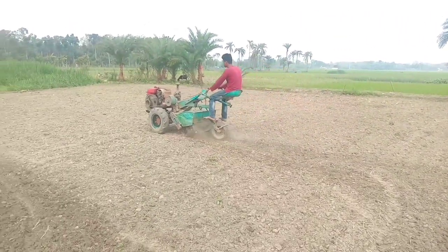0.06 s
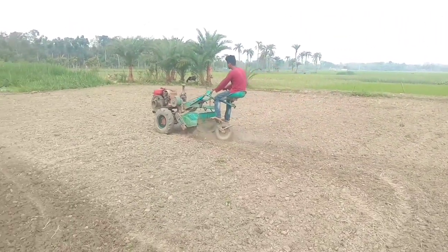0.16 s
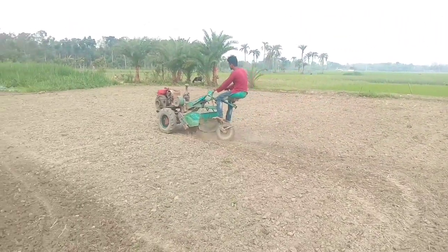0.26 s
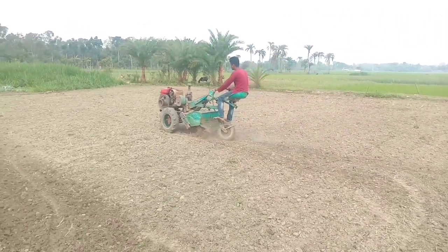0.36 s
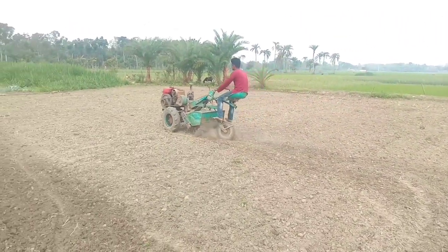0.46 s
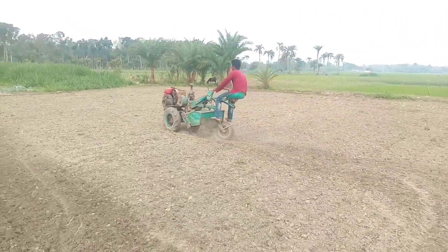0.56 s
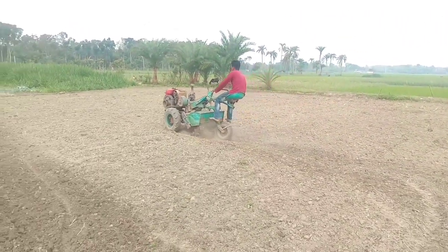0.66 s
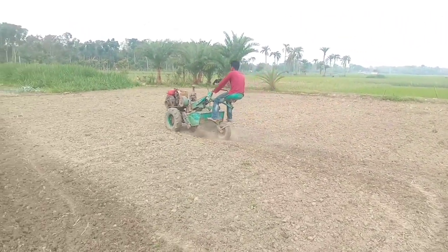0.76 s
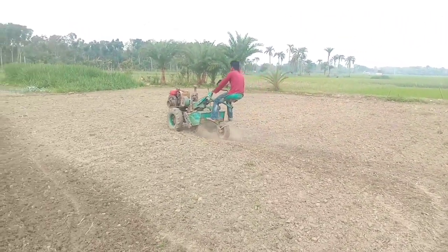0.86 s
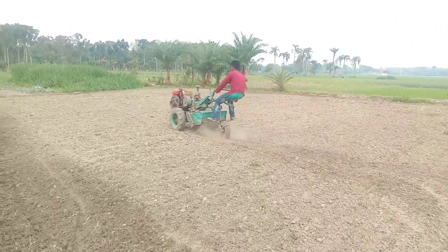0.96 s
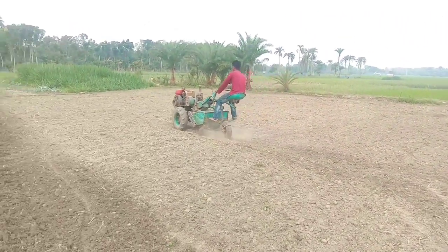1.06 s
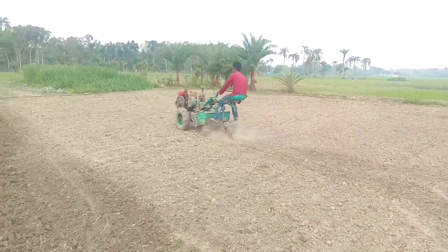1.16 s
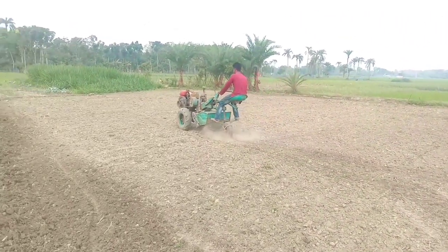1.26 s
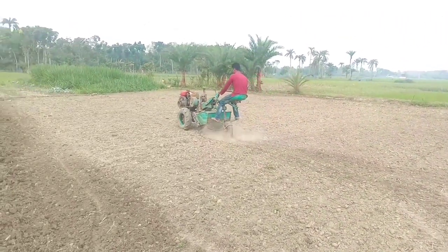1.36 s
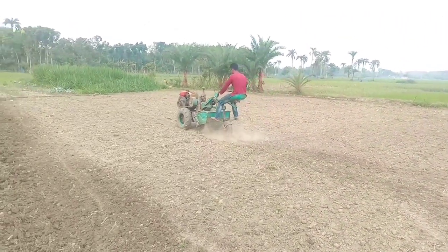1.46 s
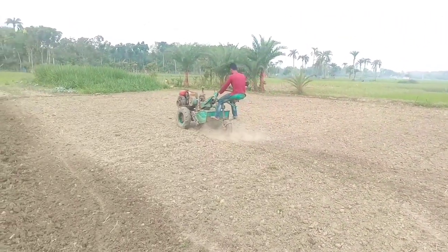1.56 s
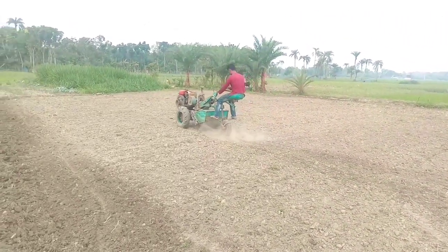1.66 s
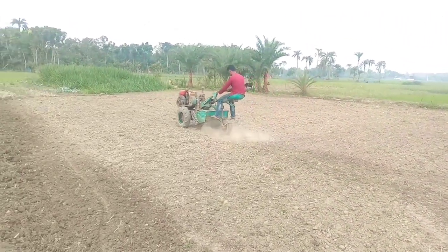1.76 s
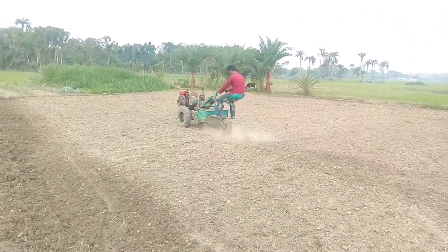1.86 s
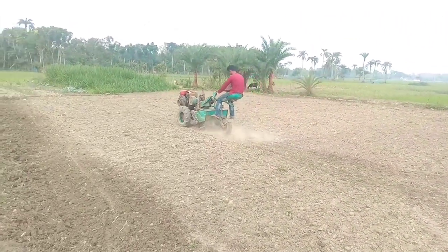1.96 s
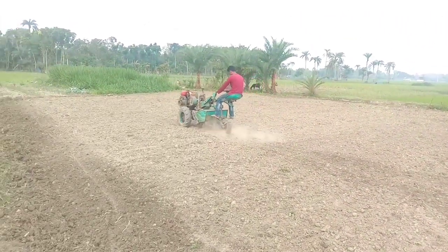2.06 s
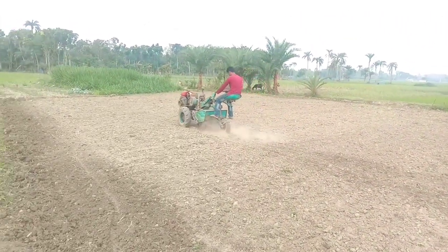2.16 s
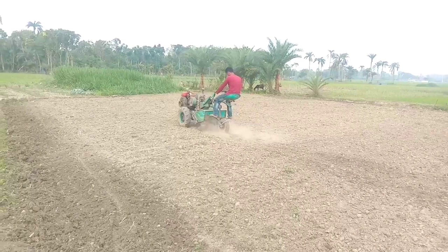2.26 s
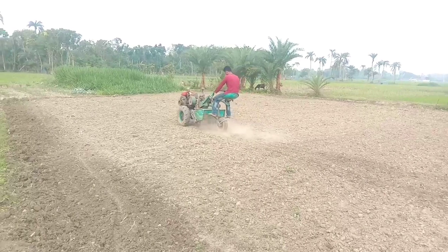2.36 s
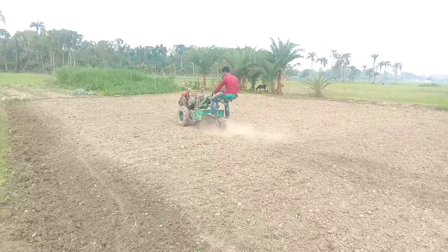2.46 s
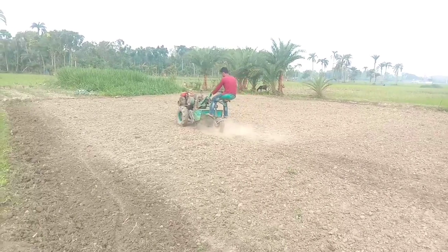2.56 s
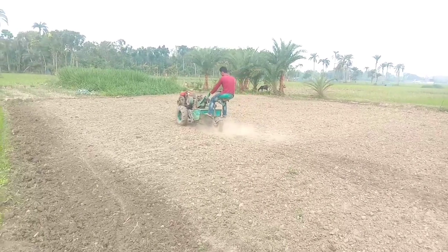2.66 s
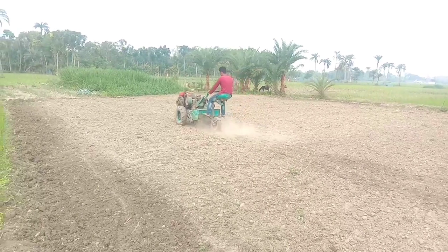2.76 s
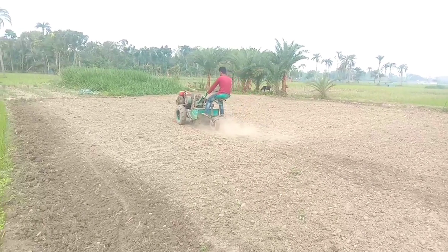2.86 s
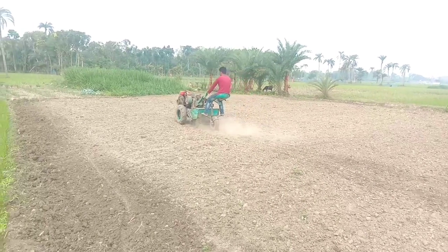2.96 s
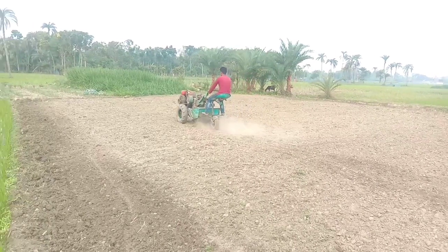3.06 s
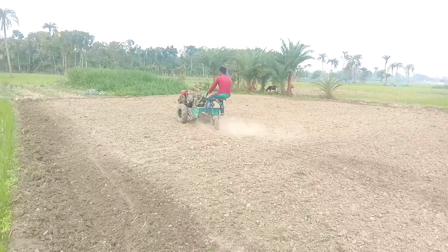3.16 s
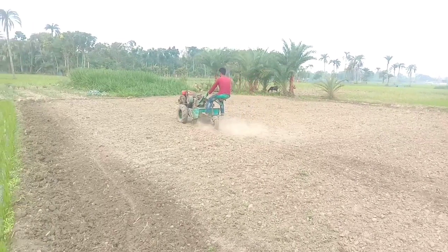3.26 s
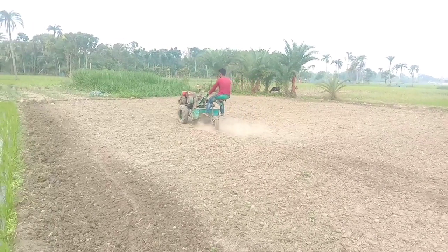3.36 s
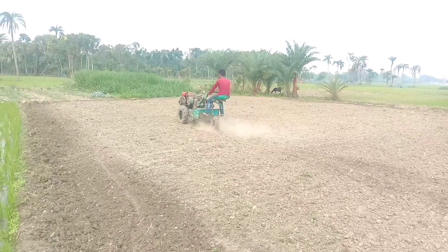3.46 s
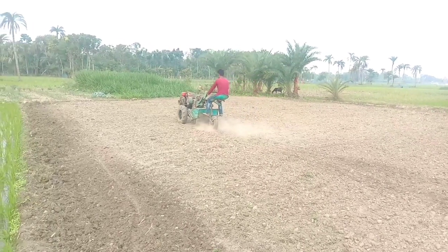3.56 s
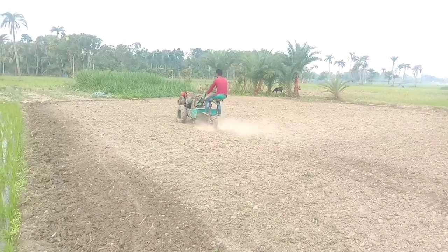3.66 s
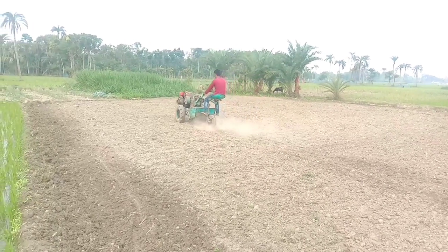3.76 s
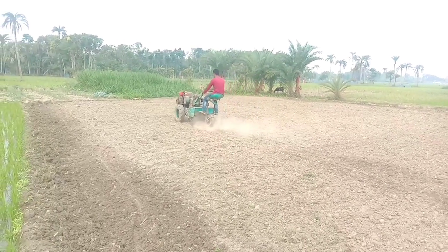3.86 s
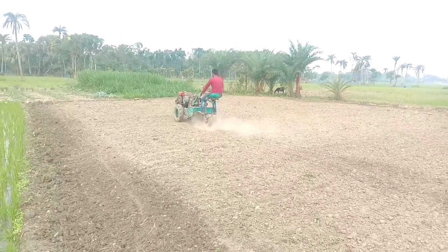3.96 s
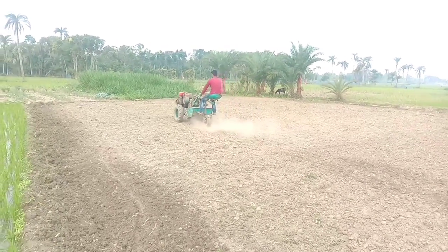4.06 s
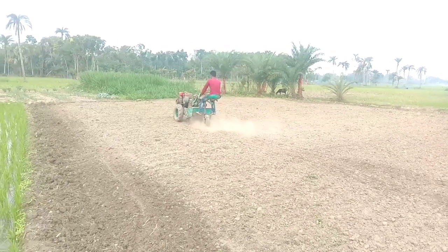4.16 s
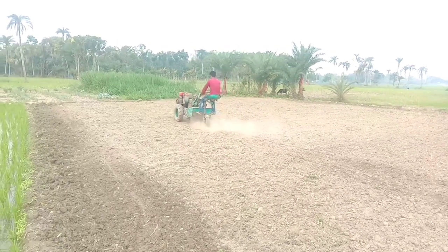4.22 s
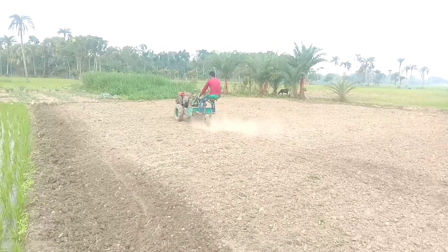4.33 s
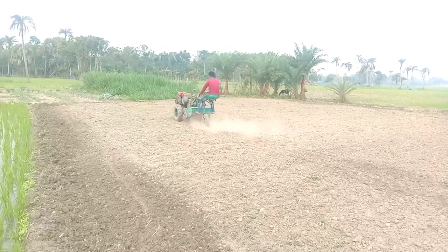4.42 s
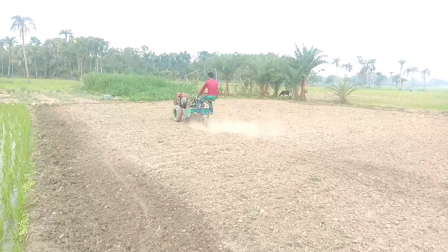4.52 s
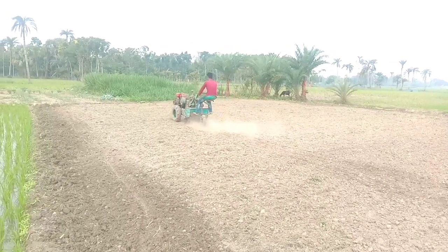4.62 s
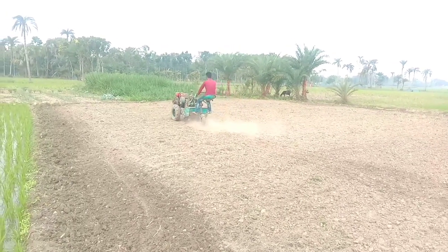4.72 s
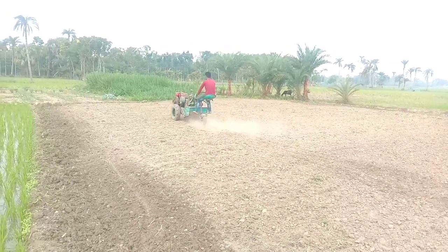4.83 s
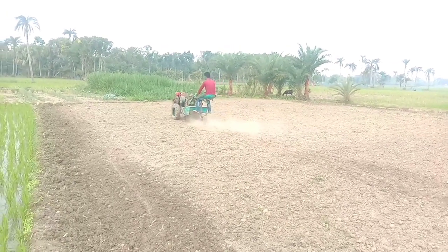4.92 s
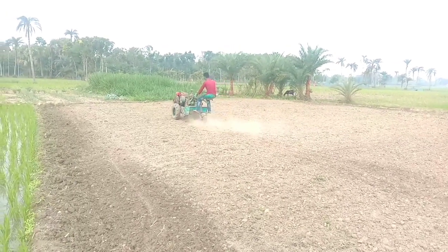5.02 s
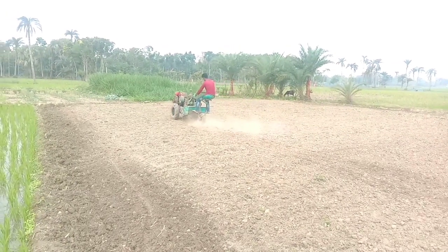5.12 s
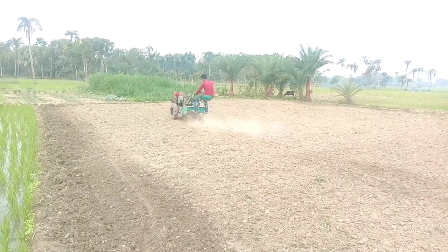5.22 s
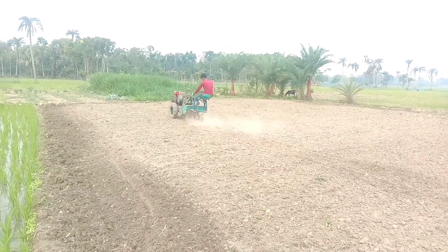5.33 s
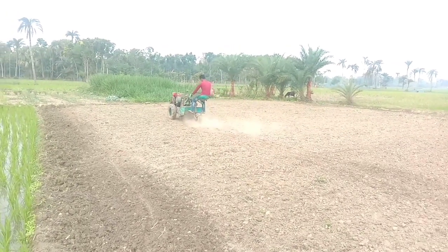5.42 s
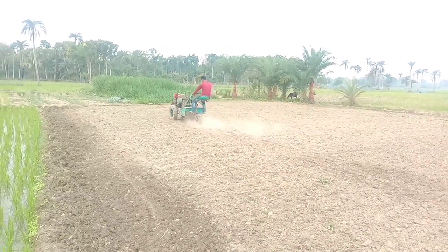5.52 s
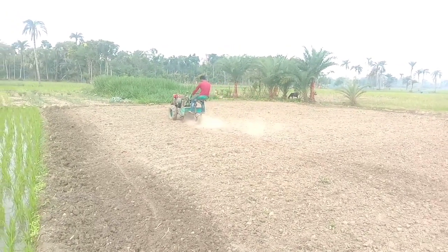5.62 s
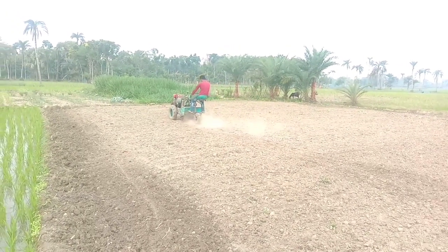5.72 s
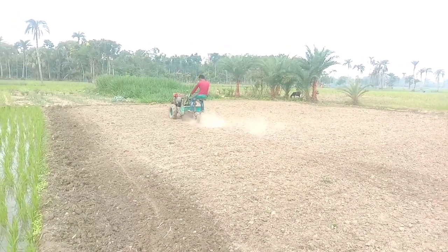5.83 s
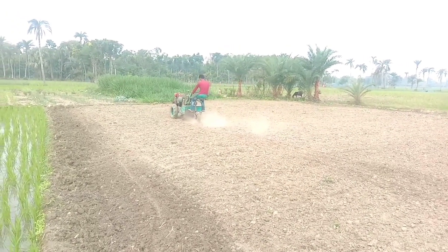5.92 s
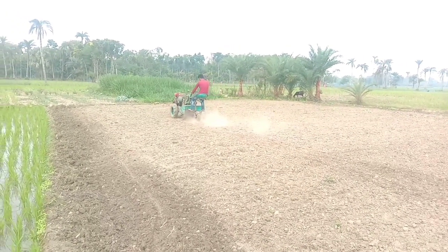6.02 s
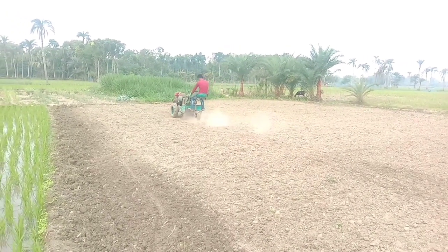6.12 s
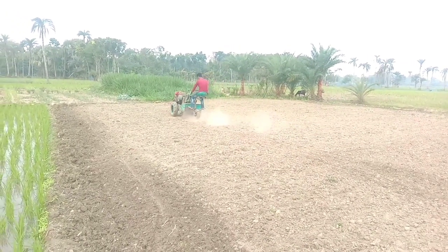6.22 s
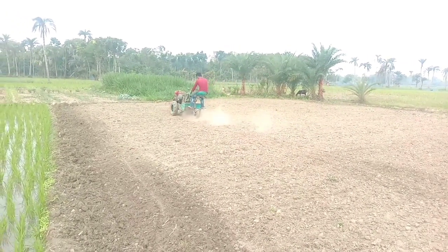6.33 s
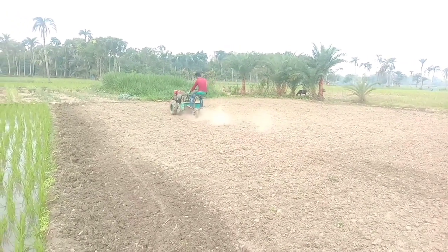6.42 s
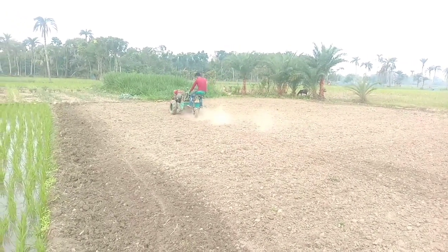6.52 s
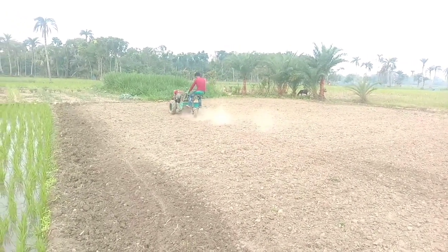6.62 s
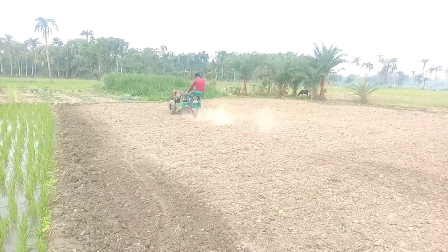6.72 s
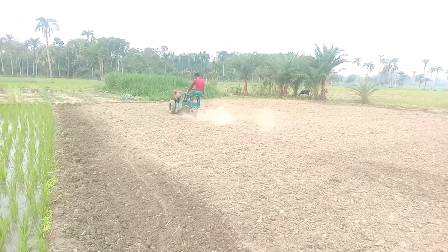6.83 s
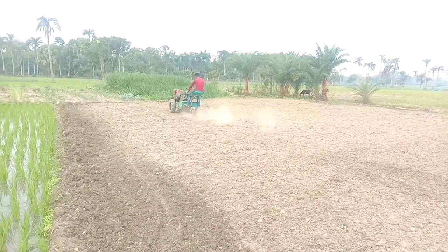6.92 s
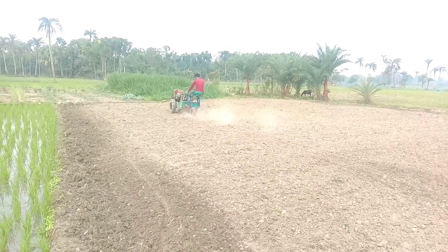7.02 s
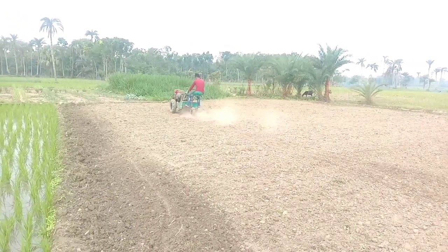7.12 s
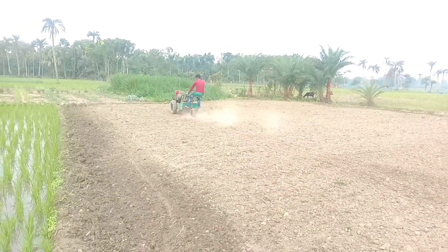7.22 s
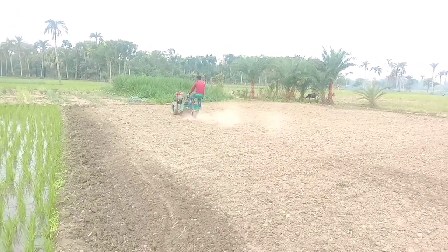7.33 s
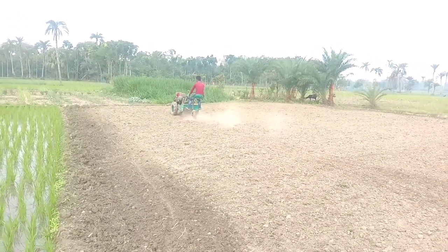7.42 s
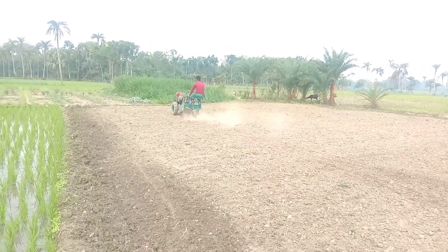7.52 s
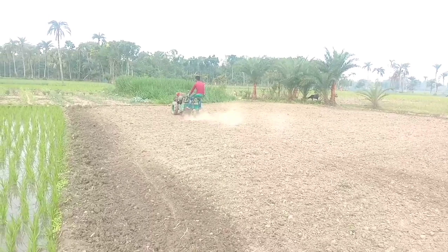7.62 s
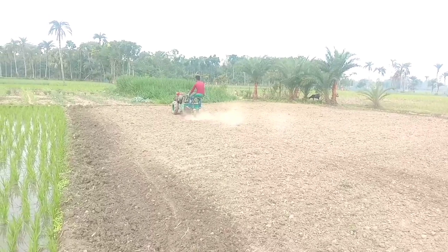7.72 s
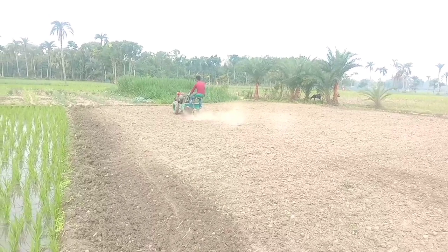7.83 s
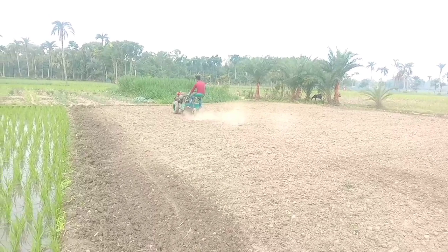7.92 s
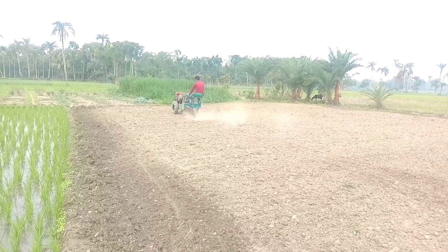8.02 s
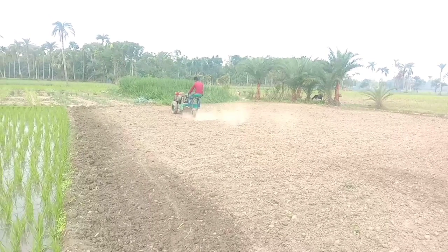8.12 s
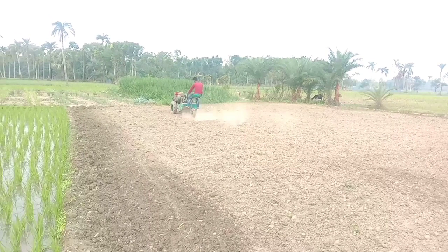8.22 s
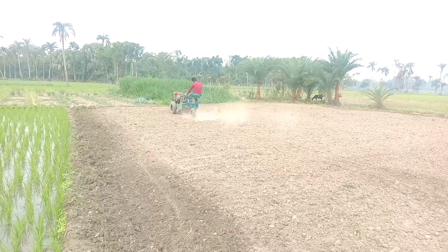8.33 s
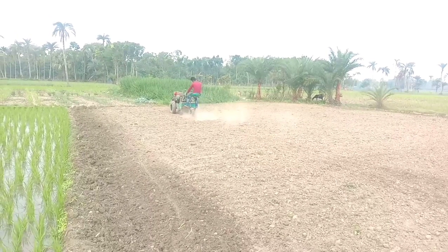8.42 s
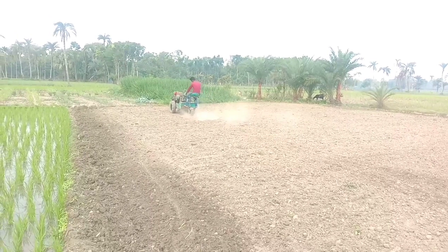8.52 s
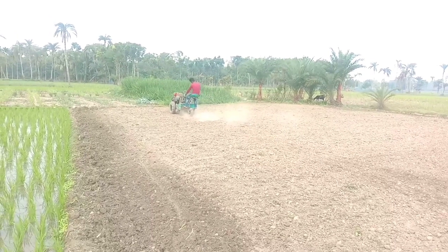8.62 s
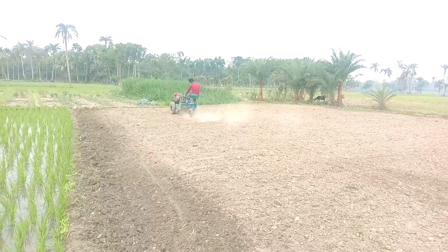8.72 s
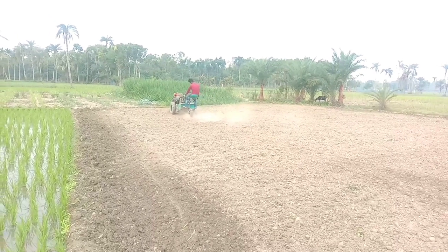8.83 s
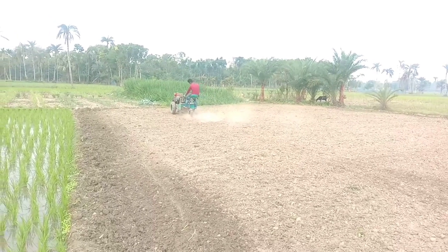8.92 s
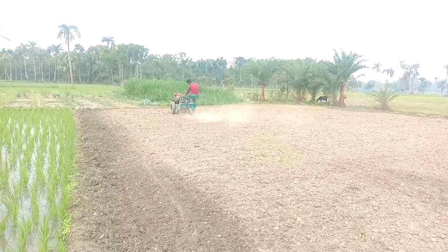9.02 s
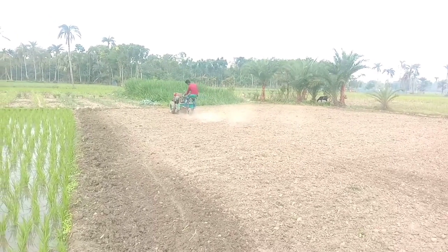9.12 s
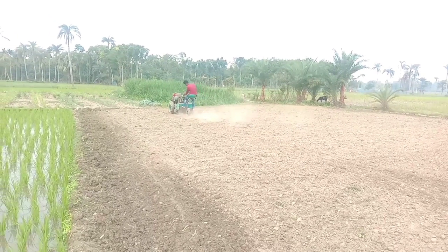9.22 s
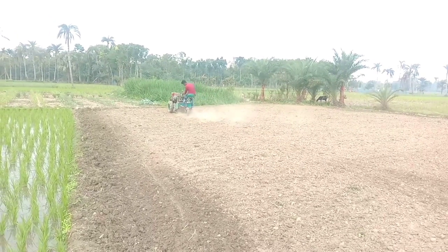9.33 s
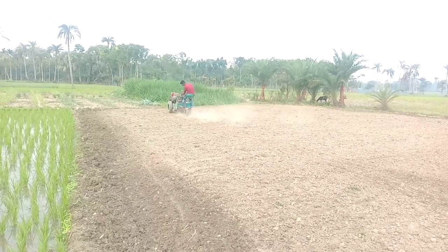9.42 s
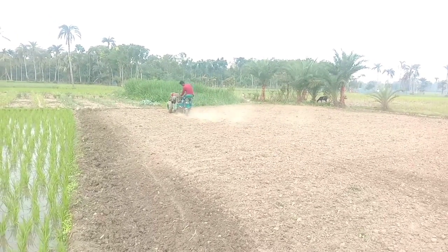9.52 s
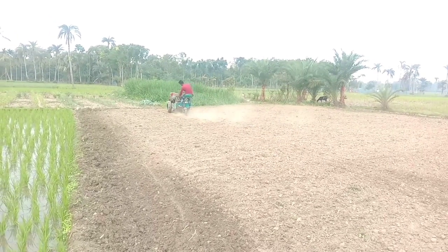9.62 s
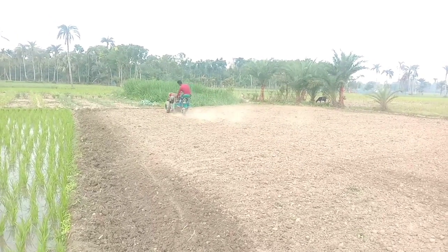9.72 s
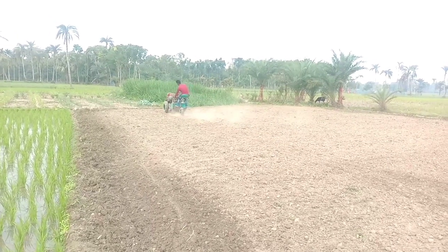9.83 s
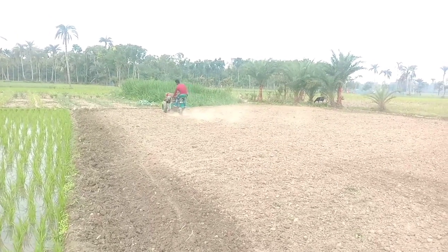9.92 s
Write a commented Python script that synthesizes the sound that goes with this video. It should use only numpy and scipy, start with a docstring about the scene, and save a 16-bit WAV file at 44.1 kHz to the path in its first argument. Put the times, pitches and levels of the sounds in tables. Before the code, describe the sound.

The fast, steady thudding of a small diesel tiller gradually fades over open soil, with metallic clatter and occasional dull thumps.

```python
"""A single-cylinder diesel power tiller sets off side-on across a dry field, its exhaust thudding
fourteen times a second over the knock of the block and the rattle of gears and covers.
As it swings away, tines thump into clods, slack gears knock, the frame jolts and loose steel clinks.
After about six seconds it is heard from behind; the engine sags a little and keeps fading,
its tone hollowed by the reflection off bare soil."""
import sys
import numpy as np
from scipy import signal
from scipy.io import wavfile

SR = 44100
rng = np.random.default_rng(int(sys.argv[2]) if len(sys.argv) > 2 else 0)


def waveform_to_disk(signal):
    """Save audio, clipped to [-1, 1], as 16-bit WAV at the path in sys.argv[1]."""
    frames = np.transpose(np.atleast_2d(signal))
    scaled = np.clip(frames, -1, 1) * 32767
    samples = np.round(scaled).astype(np.int16)
    wavfile.write(sys.argv[1], SR, samples)


N = 440118
TIME = np.arange(N) / SR
START_M, AWAY_M_PER_S = 7.18, 1.028

# rush of turbulent exhaust gas: freq_hz, near_db, far_db
GAS_TONE = [(20.6, -18, -24), (44.7, -17, -12), (78, -10, -7), (119, -4, 2.5), (200, -0.5, 1.5),
            (329, -2.5, -4), (395, -4, -15.5), (513, -0.5, -5.5), (580, -6, -12), (645, -6.5, -11.5),
            (746, -19.5, -23.5)]
# body of the engine block and gear case: freq_hz, near_db, far_db
BLOCK_TONE = [(808, -17.5, -25), (903, -4, -8.5), (1128, 4, 0), (1150, -0.8, -5.5), (1249, 6.5, 4.5),
              (1314, -3.5, -6), (1625, -3, -3), (1784, -8.5, -8), (1950, -6, -6.5), (2165, -6.5, -13),
              (2272, -13.5, -23)]
# bright rattle of the sheet steel covers: freq_hz, near_db, far_db
COVER_TONE = [(2460, -3, -4.5), (2750, 3, -5.5), (3330, -2, -8), (3524, -9.5, -17.5), (3820, -1.5, 2.5),
              (4150, 1, 1.5), (4670, -14, -13), (5060, -3, 3.5), (5430, -8, -9), (5750, -15.5, -18.5),
              (6300, -10.5, -4.5), (6615, -23.5, -29.5)]
# valve gear fizz, beamed differently with heading: freq_hz, side_on_db, turning_db, behind_db
VALVE_TONE = [(6690, -13, -18, -16), (7180, 4, 7, 4.5), (7780, -9, 0, -4.5), (8600, -5.5, 1.5, 3),
              (9280, -14, -0.5, -15), (10080, 3, -10, 0), (10600, -10, -10, -2), (10960, -2, 0.5, -5.5),
              (12400, -9, -16, -3), (13450, -21, -15.5, -17.5), (14250, -13, -10, -13),
              (14800, -4, -8, -10), (15700, -10, -10, -10)]


def exhaust(gas_decay_s=0.0045, gas_steady=1.15):
    """Gas pulses boom through the silencer; each blowdown drags a rush of turbulence."""
    # gas pulses of a four-stroke cycle (blowdown, piston push, a small late pressure dip that
    # shapes the thud): place_cycles, size, decay_s
    puffs = [(-.058, 1, .0004), (.07, 1.05, .0035), (.66, -.4, .0011)]
    # the silencer's boomy response: freq_hz, gain_db
    silencer = [(41, -44), (56, -42), (71, -8), (84, -5), (98.5, 5.5), (112.5, -6.5), (126.5, 4.5),
                (155, -2), (186, -6), (250, -13), (310, -18.5), (380, -23), (520, -29), (720, -40)]
    # soft soil hollows the rush as the sound grazes it: distance_m, far_tone_weight
    grazing = [(8.0, 0.3), (12.2, 0.62), (15.2, 0.98)]
    trains = [strokes(place, scatter_db=1.6, jitter_s=.00009) for place, _, _ in puffs]
    flow = sum(size * die_away(train, decay_s) / decay_s
               for train, (_, size, decay_s) in zip(trains, puffs))
    boom = unit(colour(flow - flow.mean(), silencer))
    turbulence = rng.standard_normal(N) * (gas_steady + die_away(trains[0], gas_decay_s))
    rush = over_soil(turbulence, GAS_TONE, grazing)
    boom *= amp(receding(start_db=-24.5, doubling_db=6.23))
    rush *= amp(receding(start_db=-28, doubling_db=7.6))
    return amp(waver(depth_db=-0.05, top_hz=3)) * (boom + rush)


def clatter(build_s=0.0013):
    """The blows of each cycle shake block, covers and valve gear above the steady churn of the gears."""
    # combustion, piston slap, exhaust opening, valve seating, rocker tick:
    # place_cycles, decay_s, block_db, covers_db, valves_db
    blows = [(.735, .012, -2.5, -.5, -8), (.865, .01, -.5, -9, -12), (.972, .007, -5, 6.5, 2),
             (.235, .011, -7, 2.5, -3), (.53, .004, -7, -1, 4)]
    # soft soil hollows the metal as the sound grazes it: distance_m, far_tone_weight
    grazing = [(12.2, 0.23), (15.2, 1.18)]
    # the machine swings round: time_s, heading (0 side-on, 1 turning away, 2 and up from behind)
    swing = [(.55, 0), (1.15, 0.62), (2.7, 0.44), (4.0, .95), (5.4, 1.3), (5.7, 2.2)]
    # the valve gear is shielded as the machine turns: side_on_db, turning_db, behind_db
    shielding = (3, -1.8, -0.6)
    power = np.ones((3, N))
    for place, decay_s, *blow_db in blows:
        energy = die_away(strokes(place, scatter_db=2.7, jitter_s=0.0013) ** 2, decay_s)
        # vibration takes a moment to spread through the castings
        power += amp(blow_db)[:, None] ** 2 * die_away(energy, build_s) / (build_s * SR)
    block_shake, cover_shake, valve_shake = np.sqrt(power)
    block = over_soil(block_shake * rattle(per_s=1700, spread_db=2, smooth=1.75), BLOCK_TONE, grazing)
    covers = over_soil(cover_shake * rattle(per_s=3200, spread_db=0, smooth=1.33), COVER_TONE, grazing)
    fizz = valve_shake * rattle(per_s=4000, spread_db=3, smooth=1.3)
    heading = np.clip(curve(swing), 0, 2)
    angles = [unit(colour(fizz, VALVE_TONE, column)) for column in (1, 2, 3)]
    valves = unit(sum(np.maximum(1 - abs(heading - k), 0) * angle for k, angle in enumerate(angles)))
    block *= amp(receding(start_db=-25, doubling_db=6.36))
    covers *= amp(receding(start_db=-34.5, doubling_db=8.27))
    valves *= amp(receding(start_db=-51, doubling_db=7.7) + np.interp(heading, range(3), shielding))
    return amp(waver(depth_db=0.48, top_hz=4.3)) * (block + covers + valves)


def tine_thumps():
    """Tines hit clods and the hood answers with a low, dull ring."""
    # hits on clods: start_s, level_db
    hits = [(.562, -18), (.645, -19), (1.214, -19), (2.053, -15), (2.136, -17), (2.69, -17.5), (4.356, -22),
            (4.59, -15), (7.416, -21), (7.571, -19), (7.629, -18.5), (7.659, -19)]
    # modes of the tine hood: pitch_hz, level_db, t60_s
    hood = [(152, 9, 0.11), (193, 4.5, 0.18), (236, 1.5, 0.088), (324, -1, 0.15), (495, -1, 0.033)]
    return struck(hits, hood, trim_db=-0.3, contact_s=0.013, bounce=2.2)


def gear_knocks():
    """Slack gears knock and ring their case."""
    # knocks of the gears: start_s, level_db
    hits = [(1.1543, -12), (3.0897, -20), (3.3686, -20), (5.6773, -19), (6.9022, -19), (7.511, -22),
            (8.1327, -18)]
    # modes of the gear case: pitch_hz, level_db, t60_s
    gear_case = [(1130, -12, 0.027), (1238, 18, 0.072), (1400, -5, 0.027), (1560, -27, .025)]
    return struck(hits, gear_case, trim_db=-1.5, contact_s=.003, bounce=0.32)


def steel_clinks(light_count=24, scatter_db=5):
    """Loose steel chatters and rings: hard clinks, with lighter ones at random in between."""
    # the hardest clinks: start_s, level_db
    hard_hits = [(0.2404, -23.5), (0.952, -22.5), (0.9892, -21), (1.659, -27), (1.697, -25),
                 (1.8394, -22.5), (1.88, -24), (2.4397, -19.5), (2.7194, -23), (3.695, -24),
                 (4.9935, -23.5), (5.2794, -25), (6.7126, -23.5), (6.7815, -27), (6.8174, -25),
                 (7.5384, -23), (8.786, -26.5), (8.821, -22.5)]
    # modes of the loose steel: pitch_hz, level_db, t60_s
    steel = [(2610, -12, 0.035), (2870, -0.5, 0.041), (3240, -2, 0.046), (3764, 2, 0.083),
             (4110, -8, 0.042), (4934, -1, 0.057), (5046, 1, 0.05), (6060, -22, .05)]
    when, softness = rng.random((light_count, 2)).T
    start_s = when * N / SR
    level_db = receding(start_db=-27, doubling_db=5.7, time_s=start_s) - scatter_db * softness
    light_hits = list(zip(start_s, level_db))
    return struck(hard_hits + light_hits, steel, trim_db=-2.7, contact_s=0.011, bounce=3.5)


def frame_jolts(trim_db=3.5, rise_s=.003):
    """A bump sets the whole frame rattling for a moment."""
    # bumps to the frame: start_s, level_db, decay_s
    bumps = [(.872, -30, 0.049), (0.949, -30, 0.044), (1.151, -28.5, 0.028), (2.438, -30, .014),
             (2.688, -28.5, 0.044), (4.591, -22.5, 0.02), (4.619, -31, 0.018), (6.404, -29, 0.035)]
    t, shake = TIME[:SR // 3], np.zeros(N)
    rise = 1 - np.exp(-t / rise_s)
    for start_s, level_db, decay_s in bumps:
        add(shake, start_s, amp(level_db + trim_db) * rise * np.exp(-t / decay_s))
    contacts = rattle(per_s=2400, spread_db=1.5, smooth=1.1)
    blend = [(BLOCK_TONE, 0), (COVER_TONE, -10), (GAS_TONE, -8), (VALVE_TONE, -34)]
    return shake * sum(amp(db) * unit(colour(contacts, tone)) for tone, db in blend)


def grit(trim_db=-8, decay_s=.004):
    """A small stone ticks sharply on the hood."""
    # grit flung against the steel: start_s, level_db
    hits = [(2.4369, -35)]
    ticks = np.zeros(N)
    for start_s, level_db in hits:
        add(ticks, start_s, amp([level_db + trim_db]))
    return die_away(ticks, decay_s) * unit(colour(rng.standard_normal(N), VALVE_TONE))


def strokes(place, scatter_db, jitter_s, start_cycles=-0.1257):
    """One impulse each engine cycle at the given place, never quite alike."""
    # engine speed, sagging as the tines bite: time_s, firing_hz
    speed = [(0.0, 13.937), (1.1, 14.139), (1.5, 14.05), (3.1, 14.18), (4.0, 14.145), (4.7, 14.002),
             (7.2, 13.873), (7.6, 13.754), (9.0, 13.594), (10.0, 13.72)]
    phase = start_cycles + np.cumsum(curve(speed)) / SR
    cycles = np.arange(-1, int(phase[-1]) + 2) + place
    lateness, strength = rng.standard_normal((len(cycles), 2)).T
    start_s = np.interp(cycles, phase, TIME, left=-1, right=-1) + jitter_s * lateness
    at = np.round(start_s * SR).astype(int)
    inside = (at >= 0) & (at < N)
    train = np.zeros(N)
    train[at[inside]] = amp(scatter_db * np.clip(strength[inside], -2, 1))
    return train


def struck(hits, modes, trim_db, contact_s, bounce, detune=0.00087):
    """Each blow, with a short chatter after it, rings the modes of one part."""
    t, track = TIME[:SR // 3], np.zeros(N)
    # the part radiates little outside the range of its modes
    radiation = signal.butter(3, [.7 * modes[0][0], 1.25 * modes[-1][0]], "bandpass", fs=SR, output="sos")
    for start_s, level_db in hits:
        ring = np.zeros(len(t))
        for pitch_hz, mode_db, t60_s in modes:
            pitch_hz *= 1 + detune * rng.standard_normal()
            ring += amp(mode_db - 60 * t / t60_s) * np.sin(2 * np.pi * pitch_hz * t)
        chatter = rng.standard_normal(len(t)) * np.exp(-t / contact_s)
        force = (t == 0) + bounce * chatter / np.linalg.norm(chatter)
        sound = signal.fftconvolve(signal.sosfilt(radiation, force), ring)[:len(t)]
        add(track, start_s, amp(level_db + trim_db) * sound / abs(sound).max())
    return track


def rattle(per_s, spread_db, smooth):
    """Many tiny metal contacts of uneven size in a smooth rush."""
    clicks = rng.standard_normal(N) * (rng.random(N) < per_s / SR)
    clicks *= amp(spread_db * np.minimum(rng.exponential(1, N), 4))
    return unit(unit(clicks) + smooth * rng.standard_normal(N))


def waver(depth_db, top_hz):
    """A slow random swell in dB, as the load changes over uneven ground."""
    hz, t = top_hz * np.geomspace(.1, 1, 20), TIME[::SR // 100]
    swell = np.sin(2 * np.pi * (hz * t[:, None] + rng.random(len(hz)))).sum(1)
    return depth_db * np.interp(TIME, t, unit(swell))


def over_soil(x, tone, grazing):
    """The ground reflection cancels more of some bands as the machine recedes."""
    far = np.interp(distance(TIME), *np.transpose(grazing))
    near_tone, far_tone = colour(x, tone, column=1), colour(x, tone, column=2)
    return unit((1 - far) * unit(near_tone) + far * unit(far_tone))


def receding(start_db, doubling_db, time_s=TIME):
    """Level in dB of a part that loses doubling_db with each doubling of distance."""
    return start_db - doubling_db * np.log2(distance(time_s) / START_M)


def distance(time_s):
    """Metres from the listener, growing at walking pace."""
    return START_M + AWAY_M_PER_S * time_s


def colour(x, tone, column=1):
    """Minimum-phase EQ from one column of a table, falling 60 dB an octave beyond its ends."""
    tone = np.array(tone)
    octave = np.log2(np.abs(np.fft.fftfreq(16384, 1 / SR)) + 1)
    points = np.log2(tone[:, 0])
    beyond = abs(octave - np.clip(octave, points[0], points[-1]))
    gain_db = np.maximum(np.interp(octave, points, tone[:, column]) - 60 * beyond, -100)
    log_spectrum = np.conj(signal.hilbert(np.log(amp(gain_db))))
    response = np.fft.ifft(np.exp(log_spectrum)).real
    return signal.oaconvolve(x, response[:len(octave) // 2])[:len(x)]


def die_away(train, decay_s):
    """Each impulse becomes an exponential decay."""
    return signal.lfilter([1], [1, -np.exp(-1 / (SR * max(decay_s, 1 / SR)))], train)


def amp(db):
    """Decibels to gain."""
    return 10 ** (np.asarray(db) / 20)


def unit(x):
    """Scales to rms 1."""
    return x / np.sqrt(np.mean(x ** 2) + 1e-20)


def curve(rows):
    """A time table read at every sample."""
    return np.interp(TIME, *np.transpose(rows))


def add(mix, start_s, sound):
    """Mixes a sound in at start_s."""
    part = mix[max(round(start_s * SR), 0):][:len(sound)]
    part += sound[:len(part)]


def scene():
    """The tiller in the open field, in mono."""
    engine = exhaust() + clatter()
    return (engine + tine_thumps() + gear_knocks() + steel_clinks() + frame_jolts() + grit())[None]


def record(dry):
    """A steep low-pass trims the top of the treble."""
    edge_hz = 15550
    low_pass = signal.firwin(1023, edge_hz, window=("kaiser", 9), fs=SR)
    return signal.oaconvolve(dry, low_pass[None], "same")


dry = scene()
out = record(dry)
waveform_to_disk(out)
```